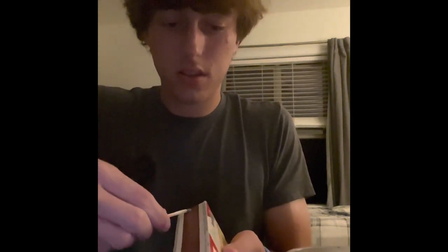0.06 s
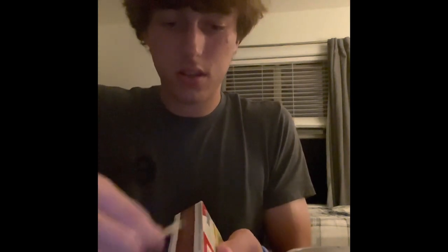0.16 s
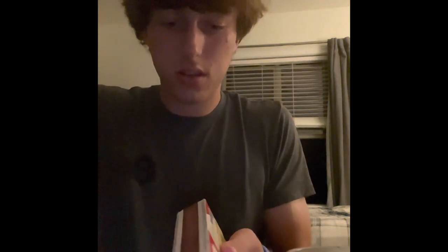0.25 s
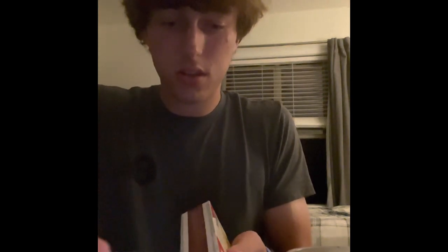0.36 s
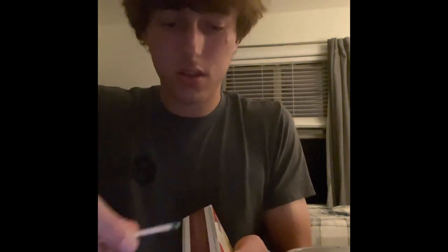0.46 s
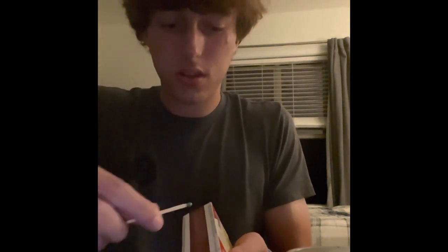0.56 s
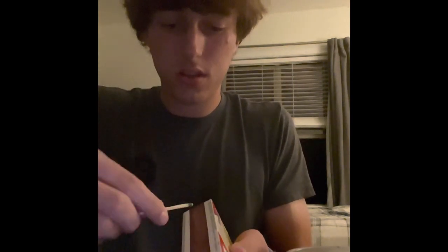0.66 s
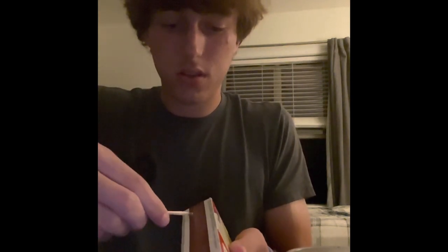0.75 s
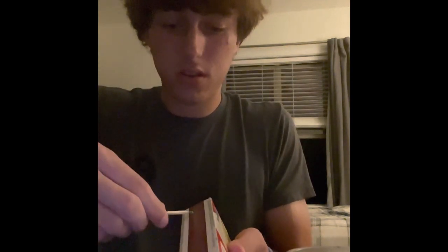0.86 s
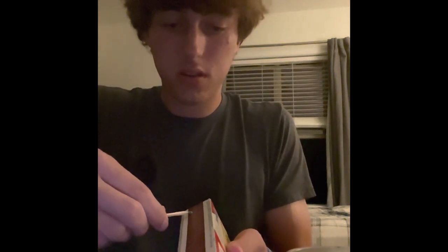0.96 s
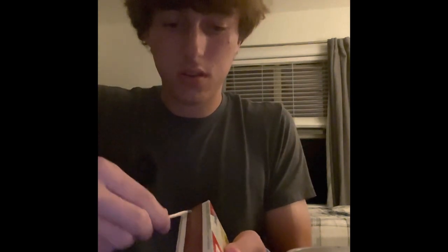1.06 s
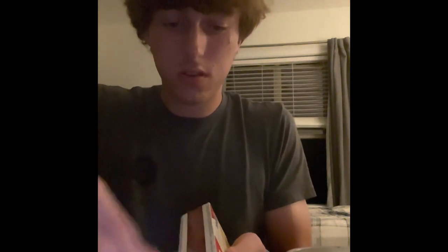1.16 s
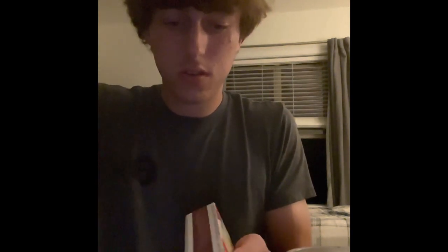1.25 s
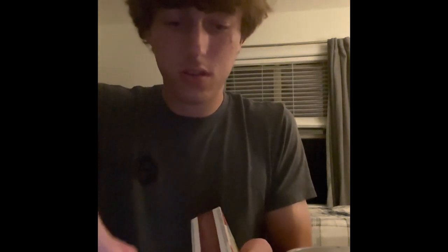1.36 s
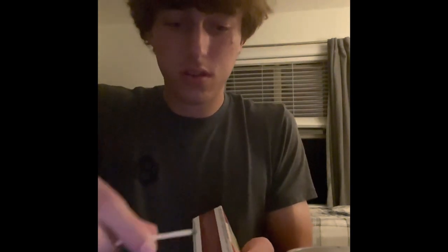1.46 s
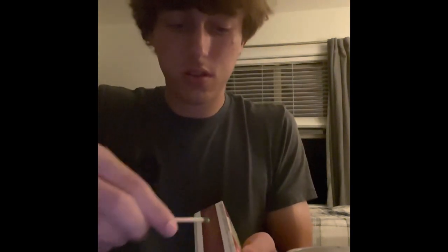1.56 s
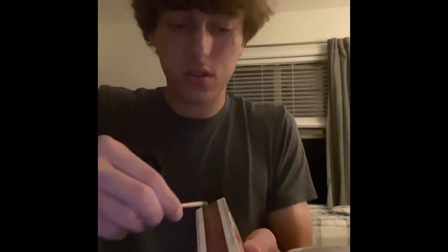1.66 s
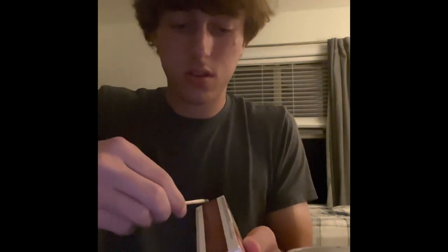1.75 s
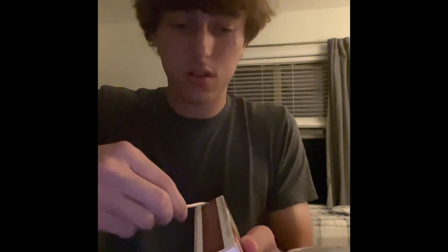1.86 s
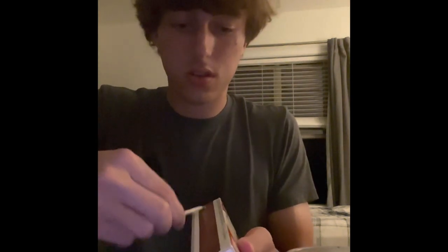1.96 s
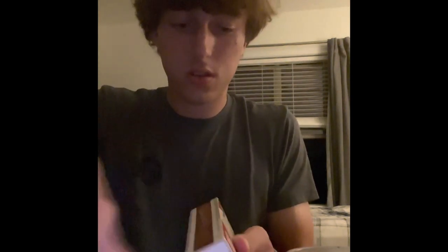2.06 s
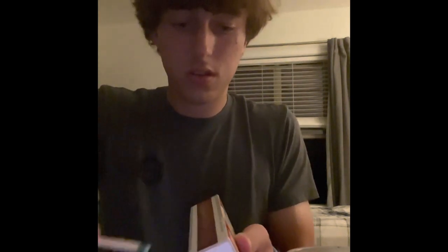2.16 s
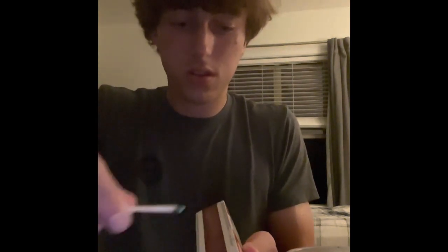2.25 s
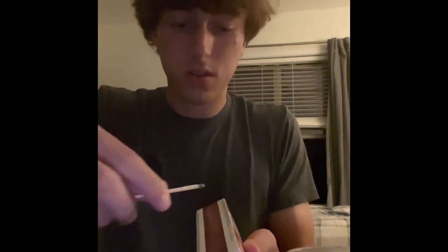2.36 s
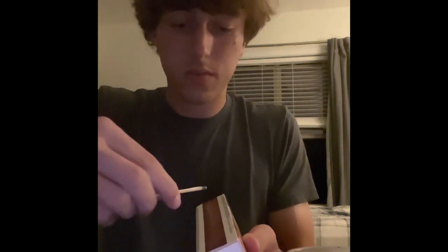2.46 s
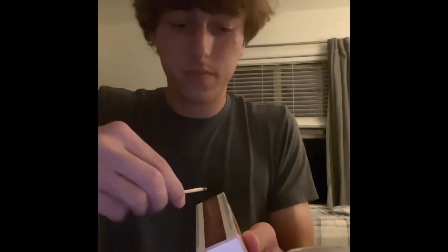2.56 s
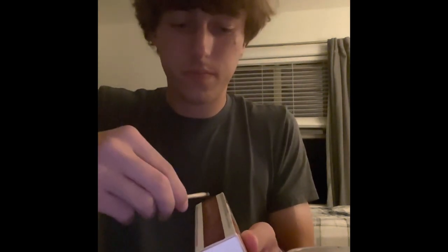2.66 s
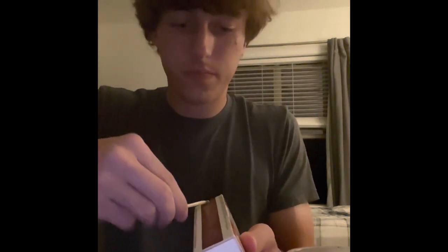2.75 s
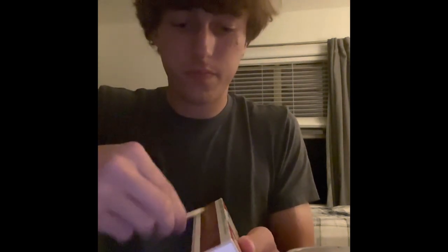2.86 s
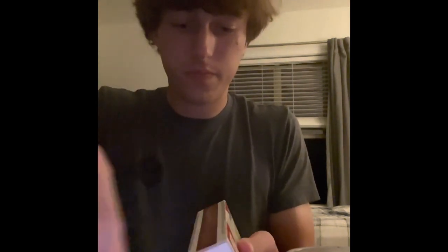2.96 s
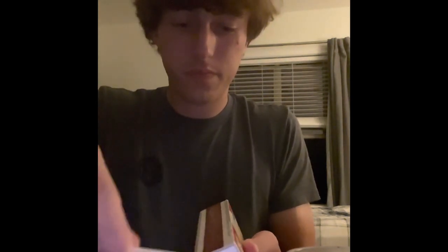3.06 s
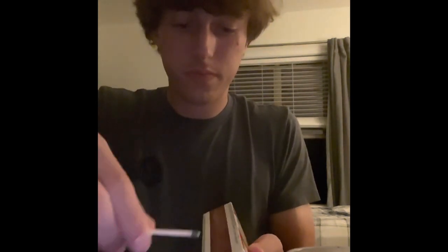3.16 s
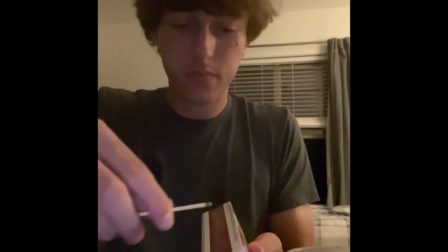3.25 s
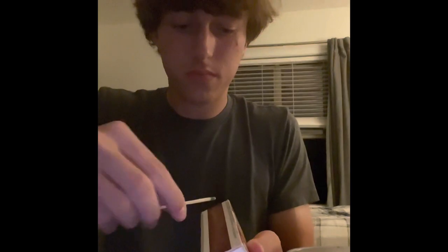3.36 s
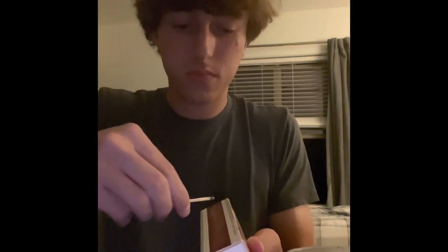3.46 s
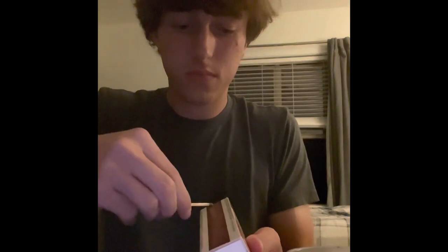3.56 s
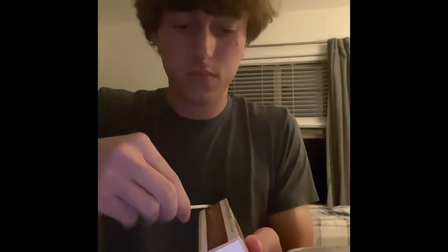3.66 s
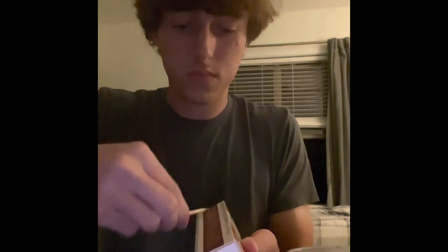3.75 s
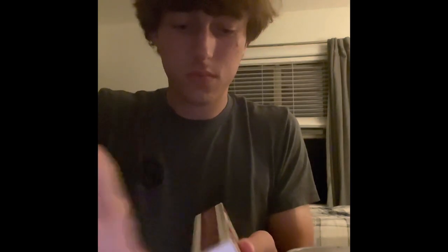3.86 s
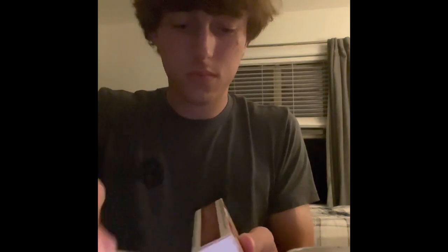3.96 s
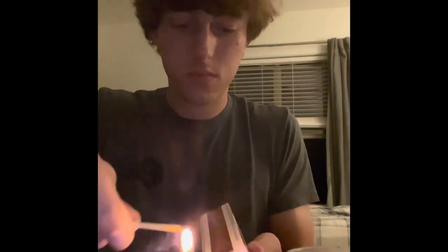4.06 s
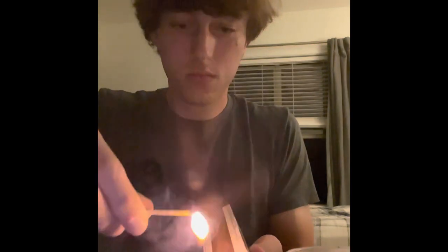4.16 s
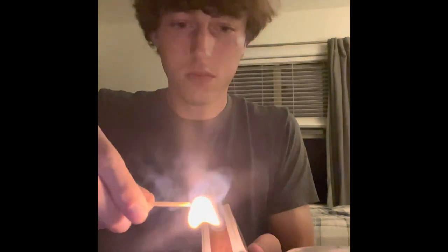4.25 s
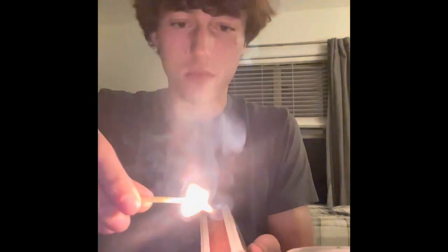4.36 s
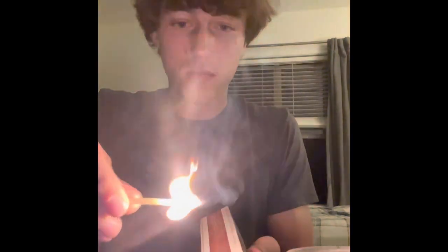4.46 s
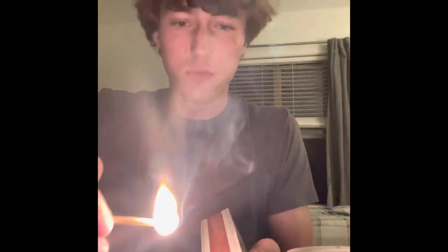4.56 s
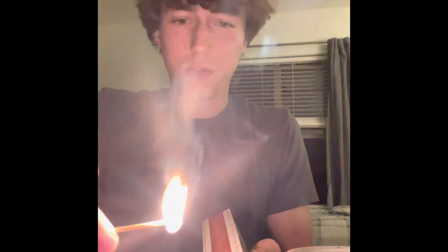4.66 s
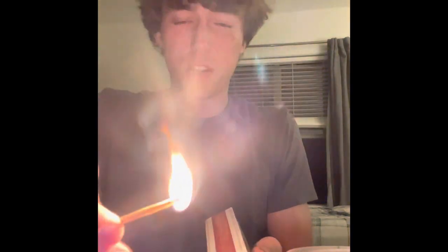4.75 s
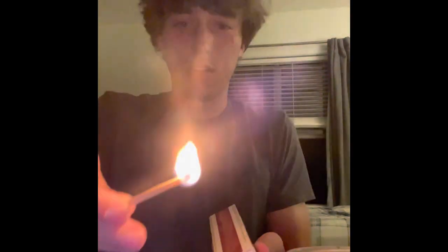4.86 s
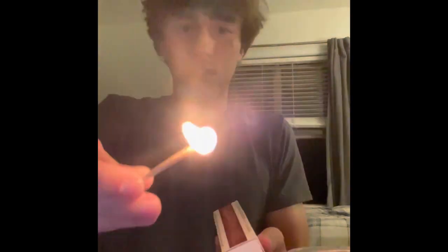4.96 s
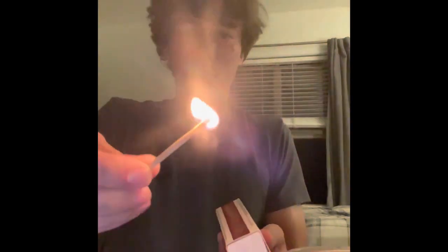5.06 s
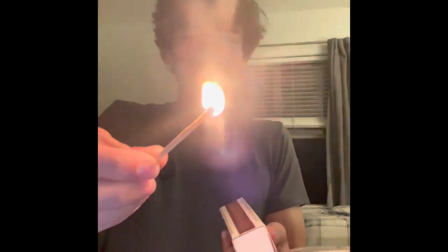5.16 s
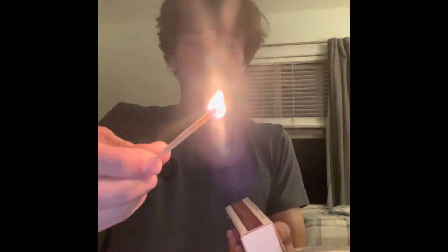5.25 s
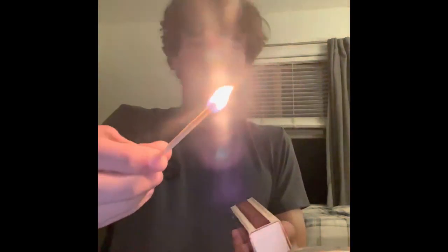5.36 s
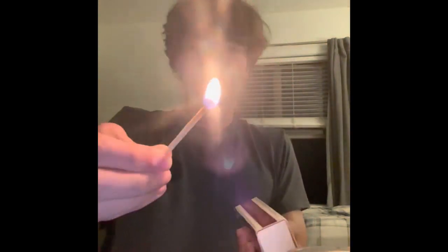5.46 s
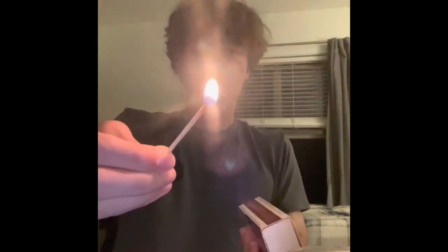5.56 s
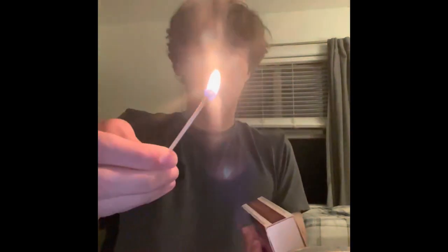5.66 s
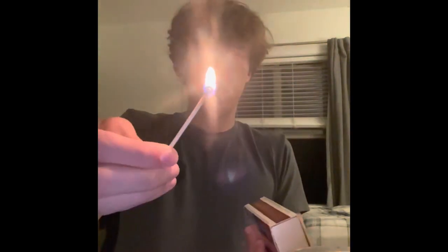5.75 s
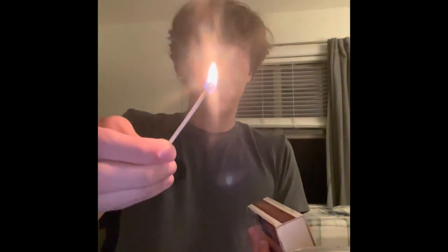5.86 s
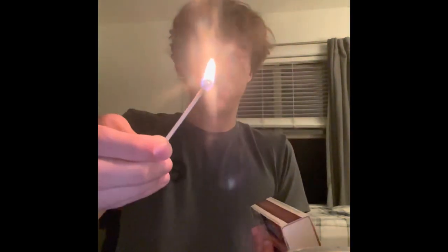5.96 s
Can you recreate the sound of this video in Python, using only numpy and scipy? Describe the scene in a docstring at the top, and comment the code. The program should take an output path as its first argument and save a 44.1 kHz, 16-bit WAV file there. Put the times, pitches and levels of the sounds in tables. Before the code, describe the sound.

A quiet furnished room with low, bassy air noise, a faint steady hum and slight microphone hiss. Close by, at 0.1 s, a match head rasps along a matchbox for a tenth of a second, speeding up and ending with a sharp snap. Light rubs and a tap of the stick at 0.77-0.95 s line it up for a second scrape at 1.08 s. More woody taps precede a third at 1.95 s and a louder, crackling fourth at 2.83 s, its slip kicking the hollow cardboard. Soft finger bumps follow around 3.2 and 3.7 s. The fifth stroke at 3.75 s crackles and catches at about 3.86 s: a dense, bright hiss flares, turning reedier and fizzier, its treble subtly sweeping, over a soft fluttering bass. It drops abruptly near 4.8 s and fades quickly. Small bump and faint ticks at 4.9-5.5 s, then just room hum.

```python
"""Low room noise and hum come first, then a wooden match is scraped five times along a matchbox close by.
Grit plucks the head and rings the cardboard box; specks of the head snap, and the last stroke lights it.
The head flares with a hiss for about a second: noise from many tiny jets, with a sweeping treble echo.
The flame flutters in the bass, and after the flare the match ticks faintly over the hum."""
import sys
import numpy as np
from scipy import signal
from scipy.fft import rfft, irfft
from scipy.io import wavfile
from scipy.ndimage import uniform_filter1d, map_coordinates

SR = 44100
rng = np.random.default_rng(int(sys.argv[2]) if len(sys.argv) > 2 else 0)


def materialize(psi):
    """Save the field psi as 16-bit PCM at rate SR to the path in sys.argv[1].

    A 1-D psi becomes a single channel; in a 2-D psi each row is a channel.
    """
    bounded = np.clip(np.atleast_2d(psi).T, -1, 1)
    quanta = np.round(bounded * 32767).astype(np.int16)
    wavfile.write(sys.argv[1], SR, quanta)


N = 264600
TIME = np.arange(N) / SR
MS = 1e-3  # seconds in a millisecond


def gain_of(db):
    """Decibels to amplitude."""
    return 10 ** (np.asarray(db) / 20)


def evened(x):
    """Scales to an rms of one."""
    return x / np.sqrt(np.mean(x ** 2) + 1e-20)


def read(points, hz):
    """Joins (frequency, value) points on a log-frequency axis."""
    point_hz, value = np.transpose(points)
    return np.interp(np.log(hz + 1), np.log(point_hz + 1), value)


def add(mix, start_s, sound):
    """Mixes a sound in at a time."""
    part = mix[max(round(start_s * SR), 0):][:len(sound)]
    part += sound[:len(part)]


def shaped(x, points):
    """Gives a full-length sound the colour of a (frequency, dB) table."""
    return irfft(rfft(x) * gain_of(read(points, np.fft.rfftfreq(N, 1 / SR))), N)


def smooth_noise(count, size):
    """Slow random movement with an rms of one: white noise averaged over `size` samples."""
    return evened(uniform_filter1d(rng.standard_normal(count), size=size))


def above(hz, corner_hz, order=6):
    """A smooth step from 0 below the corner to 1 above it."""
    return 1 - 1 / (1 + (hz / corner_hz) ** order)


def resonance(hz, centre_hz, width_hz):
    """A single resonant peak of height one."""
    return 1 / (1 + (2 * (hz - centre_hz) / width_hz) ** 2)


def grains(count, per_s, spread_db):
    """A random train of tiny clicks of uneven size and either sign."""
    size = gain_of(spread_db * np.minimum(rng.exponential(1, count), 4))
    sign = rng.choice([-1., 1.], count)
    struck = rng.random(count) < per_s / SR
    return evened(size * sign * struck)


def ringing(colour_db, size=4096):
    """Minimum-phase, unit-energy response to one click of a body with the given colour function."""
    log_gain = np.log(gain_of(colour_db(abs(np.fft.fftfreq(size, 1 / SR)))))
    spectrum = np.exp(np.conj(signal.hilbert(log_gain)))
    ring = np.fft.ifft(spectrum).real[:size // 2]
    return ring / np.linalg.norm(ring)


def burst(ring, level_db, length_ms, chatter, size=800):
    """A click and a quick swell of chatter ring a body; level_db is the rms as if spread over 5 ms."""
    age = np.arange(size) / (SR * MS * max(length_ms, .1))
    push = rng.standard_normal(size) * np.sqrt(age) * np.exp(-1.5 * age)
    push *= chatter * length_ms ** 2 / np.linalg.norm(push)  # long blows are mostly chatter
    push[0] = 1
    sound = signal.fftconvolve(push, ring)
    return gain_of(level_db) * sound / np.linalg.norm(sound) * np.sqrt(5 * MS * SR)


# colour of the low room noise: frequency_hz, relative_gain_db
ROOM_AIR_COLOUR = [(20, -33.5), (32, -24), (42, -5), (52, 2), (64, -7.5), (90, -7.5), (135, -8),
                   (165, -10.5), (200, -5.5), (270, -13.5), (340, -19), (500, -35.5), (800, -50),
                   (1030, -43.5), (1500, -68.5)]
# colour of the microphone hiss: frequency_hz, relative_gain_db
MIC_HISS_COLOUR = [(500, -19), (1000, -8), (1500, -15), (1850, -7.5), (2280, 7.5), (2700, -11), (3300, -18),
                   (6500, -20.5), (10000, -24), (15000, -36)]
# steady room hum: pitch_hz, level_db, waver_hz
HUM_TONES = [(49.9, -61, 0.95), (128.3, -70, 0.5), (241.4, -64.5, 1.2)]


def background(air_db=-58, hiss_db=-75, flicker_db=-0.43):
    """Low room noise, wavering hum tones shared by both channels, and flickering microphone hiss."""
    # long waves reach both ports alike, so the channels part only as pitch rises
    spread = 0.1 * shaped(rng.standard_normal((2, N)), [(40, -23.5), (250, 10), (600, 23.5)])
    air = evened(shaped(rng.standard_normal(N) + spread, ROOM_AIR_COLOUR))
    hiss_noise = rng.standard_normal(N) + .9 * rng.standard_normal((2, N))
    hiss = evened(shaped(hiss_noise, MIC_HISS_COLOUR))
    hiss *= gain_of(flicker_db * smooth_noise(N, 1500))
    hum = 0
    for pitch_hz, level_db, waver_hz in HUM_TONES:
        wavering_hz = pitch_hz + waver_hz * smooth_noise(N, 5000)
        tone = np.sin(2 * np.pi * np.cumsum(wavering_hz) / SR)
        hum = hum + gain_of(level_db) * evened(tone)
    return gain_of(air_db) * air + gain_of(hiss_db) * hiss + hum


# time for the room to fade by 60 dB: frequency_hz, decay_s
ROOM_DECAY = [(200, 0.6), (1000, 0.33), (2800, .31), (7000, 0.26), (14000, 0.15)]


def room(x, early_db=-14, late_db=-13, early_s=0.004):
    """Dense near reflections, then the short tail of a furnished room; channels agree only in the bass."""
    t = np.arange(SR // 2) / SR
    sparse = rng.random((2, len(t))) < 5000 / SR
    common, own = rng.standard_normal((2, len(t))) * sparse
    own = signal.lfilter(*signal.butter(1, 900, "high", fs=SR), own)
    taps = np.array([common + own, common - own])
    early = taps * (t > .001) * np.exp(-t / early_s)
    hz, frame_s, frames = signal.stft(taps * (t > .007), SR, nperseg=256)
    decay = gain_of(-60 * frame_s / read(ROOM_DECAY, hz)[:, None])
    late = signal.istft(frames * decay, SR, nperseg=256)[1][:, :len(t)]
    response = gain_of(early_db) * evened(early) + gain_of(late_db) * evened(late)
    response /= np.sqrt(len(t))
    return signal.fftconvolve(x[None], response, axes=1)[:, :N]


def flame(level_db=-57):
    """The flame swells, flutters softly in the bass and sinks away."""
    colour = [(30, -26.5), (70, -3.0), (130, 1.5), (300, -9.0), (600, -14), (1500, -52.0)]
    rumble = evened(shaped(rng.standard_normal(N), colour))
    swell = np.interp(TIME, [3.85, 4.0, 4.6, 4.8, 5.05], [0.058, 0.67, 1, 0.85, 0.024])
    return gain_of(level_db) * rumble * swell


# resonances of box and stick: pitch_hz, width_hz, lift_db
BOX_RESONANCES = [(688, 180, 9.5), (790, 44, 4), (1047, 130, 9), (1505, 310, 2.5), (2020, 760, 3),
                  (2288, 260, 10), (2600, 86, 3), (3003, 250, 11.5), (3860, 820, 7), (5990, 170, 6),
                  (7230, 250, 4.5), (9500, 1900, 2.5)]
# broad colour of the box under its resonances: frequency_hz, relative_gain_db
BOX_COLOUR = [(60, -32.5), (200, -14.5), (450, -8.5), (640, 1), (1250, -4), (2500, 1.5), (3400, -9.5),
              (5000, -8.5), (8500, -11), (12000, -12), (14000, -19.5), (16000, -24.5)]


def box_db(hz, boom_db, treble_db, panel_hz, panel_db=6, panel_width=0.34):
    """Colour of the box: its modes, and one more ring that depends on where the stick meets it."""
    rings = list(BOX_RESONANCES) + [(panel_hz, panel_width * panel_hz, panel_db)]
    modes = sum(lift_db * resonance(hz, pitch_hz, width_hz) for pitch_hz, width_hz, lift_db in rings)
    boom = boom_db * (1 - above(hz, 2000))
    return read(BOX_COLOUR, hz) + modes + boom + treble_db * above(hz, 3800)


def knock(level_db, boom_db, treble_db, panel_hz, length_ms, panel_db=6, panel_width=.34):
    """One blow rings the box."""
    ring = ringing(lambda hz: box_db(hz, boom_db, treble_db, panel_hz, panel_db, panel_width))
    return burst(ring, level_db, length_ms, chatter=1.0)


# light rubs while the head is lined up: start_s, length_ms, level_db, swell_db
LIGHT_RUBS = [(.768, 16, -45.5, -1.5), (.791, 44.2, -42, -7.5), (.941, 87.7, -42.5, 0)]
RUB_BOOM_DB, RUB_TREBLE_DB, RUB_PANEL_HZ, RUB_PANEL_DB, RUB_BITE_MS = -.5, -15.5, 570, 4.5, 3.3
# the stick knocks on the box: start_s, level_db, boom_db, panel_hz
STICK_TAPS = [(0.7713, -42.5, -0.5, 2350), (.949, -31.5, -12.5, 2250), (1.277, -45, -4, 1730),
              (1.802, -40.5, -5.5, 1000), (1.986, -27, -12, 2450), (2.701, -37, -7.5, 2400),
              (2.871, -29, -14, 2380), (3.555, -37, -15, 2450), (3.907, -37, 3, 1850),
              (3.915, -36, -3, 1880)]
TAP_TREBLE_DB, TAP_MS = -13, 1.1
# soft bumps of the fingers on the hollow box: start_s, level_db, panel_hz, ring_lift_db
FINGER_BUMPS = [(3.177, -57.5, 1050, 6), (3.199, -57, 865, 10), (3.666, -54, 727, 12),
                (3.685, -58.5, 712, 7), (3.937, -43.5, 380, 14), (4.924, -55, 1248, 17)]
BUMP_BOOM_DB, BUMP_TREBLE_DB, BUMP_MS = 12.5, -14, 2


def handling(bump_ring_width=.13):
    """The stick rubs and taps the box and the fingers bump it, each touch ringing the cardboard."""
    out = np.zeros(N)
    for start_s, length_ms, level_db, swell_db in LIGHT_RUBS:
        rub = scrape(length_ms * MS, level_db, swell_db, RUB_BOOM_DB, RUB_TREBLE_DB,
                     RUB_PANEL_HZ, RUB_PANEL_DB, RUB_BITE_MS)
        add(out, start_s, rub)
    for start_s, level_db, boom_db, panel_hz in STICK_TAPS:
        add(out, start_s, knock(level_db, boom_db, TAP_TREBLE_DB, panel_hz, TAP_MS))
    for start_s, level_db, panel_hz, ring_db in FINGER_BUMPS:
        bump = knock(level_db, BUMP_BOOM_DB, BUMP_TREBLE_DB, panel_hz, BUMP_MS, ring_db, bump_ring_width)
        add(out, start_s, bump)
    return out


# broad colour of an exploding speck: frequency_hz, relative_gain_db
SNAP_COLOUR = [(100, -23), (400, -6.5), (800, -6.5), (1600, -9), (2400, 2), (3300, -7), (4200, 1.5),
               (5000, -6.5), (6200, 0), (8000, -8), (11000, -2.5), (13000, -7), (16000, -16)]


def snap(level_db, treble_db, ring_db, length_ms, ring_hz=2320, ring_width_hz=450):
    """A tiny explosion: a sharp, wide-band crack with one brief ring in the upper mids."""
    def colour_db(hz):
        ring = ring_db * resonance(hz, ring_hz, ring_width_hz)
        return read(SNAP_COLOUR, hz) + ring + treble_db * above(hz, 3200)
    return burst(ringing(colour_db), level_db, length_ms, chatter=1.9)


# the loudest specks of the head explode: start_s, level_db, treble_db, sputter_ms
LOUD_SNAPS = [(0.188, -30.5, 1, .8), (1.097, -37, 10, 0.86), (1.154, -30, -4, .5), (2.033, -30, -6, 1.9),
              (2.898, -22.5, -2, 1.1), (2.905, -20, -4, 1.5), (3.802, -27, -6, 1.1),
              (3.8236, -26.5, -5, .9), (3.833, -24.5, 6, 2.2), (3.8374, -20.5, 0, .65),
              (3.952, -41, 6, .54)]
# faint ticks of the match, after a stroke and as it burns: start_s, level_db, treble_db, mid_ring_db
MATCH_TICKS = [(0.426, -69.5, 12, 5), (1.319, -64, 9.5, 2), (4.872, -54, -28, 14.5), (5.109, -55, 7, 18),
               (5.31, -41, -30.5, 11), (5.521, -57.5, -22, 16)]
TICK_MS = 0.414


def crackle():
    """Specks of the head explode under friction; away from the strip the match only ticks."""
    out = np.zeros(N)
    for start_s, level_db, treble_db, sputter_ms in LOUD_SNAPS:
        add(out, start_s, snap(level_db, treble_db, ring_db=1.0, length_ms=sputter_ms))
    for start_s, level_db, treble_db, ring_db in MATCH_TICKS:
        add(out, start_s, snap(level_db, treble_db, ring_db, TICK_MS))
    return out


# colour of the gas jets: frequency_hz, relative_gain_db
JET_COLOUR = [(100, -12.5), (250, 5), (600, 0), (1000, -1), (1500, -5.5), (1950, 0.5), (2350, 4),
              (3000, -10), (4000, -4.5), (5000, -9.5), (7500, -11.5), (10500, -16), (12300, -16),
              (13600, -36)]
# strength of the flare, ahead of its overall trim and flutter: time_s, relative_level_db
BURN_STRENGTH = [(3.97, -47.5), (3.992, -44), (4.174, -50.5), (4.476, -46.5), (4.63, -50.5), (4.638, -48.5),
                 (4.76, -51.5)]
# the head catches and burns out: the hiss drops within OUT_S and its rest fades
CATCH_FIRE_S, BURNT_OUT_S, OUT_S, OUT_DROP_DB, OUT_FADE_DB_PER_S = 3.86, 4.796, 0.0058, 15.5, 60
# the echo off a small near surface lags more and weakens as the match is drawn away
ECHO_MS, ECHO_GROWS_MS, ECHO_CURVE = .411, .09, 2.2
ECHO_STRENGTH, ECHO_FADES = .78, .55


def flare(level_db=-2.5, flutter_db=1.47, fizz_grows=0.49, ridge_grows=1.78, ridge_hz=2400, ridge_width_hz=260):
    """Gas spits from countless pores of the head; as it takes hold, the hiss gains a reedy ridge and fizz."""
    flutter = smooth_noise(N, 500)
    jets = evened(shaped(grains(N, per_s=20000, spread_db=0.5), JET_COLOUR))
    fizz = shaped(jets, [(5500, -36.5), (9500, 5.0)])
    ridge = signal.lfilter(*signal.iirpeak(ridge_hz, ridge_hz / ridge_width_hz, fs=SR), jets)
    fizz_gain = fizz_grows * np.interp(TIME, [4.3, 4.6], [0, 1])
    ridge_gain = ridge_grows * np.interp(TIME, [4.05, 4.3], [0, 1])
    jets = jets + fizz_gain * fizz + ridge_gain * ridge
    spent_s = np.maximum(TIME - BURNT_OUT_S, 0)
    dying_db = OUT_DROP_DB * np.minimum(spent_s / OUT_S, 1) + OUT_FADE_DB_PER_S * spent_s
    burn_db = np.interp(TIME, *np.transpose(BURN_STRENGTH))
    jets *= (TIME > CATCH_FIRE_S) * gain_of(level_db + burn_db - dying_db + flutter_db * flutter)
    # a small surface throws back mostly treble, inverted, so slow notches sweep through the top of the hiss
    thrown = shaped(jets, [(1000, -14), (4000, -7), (6500, 0)])
    burnt = np.clip((TIME - CATCH_FIRE_S) / (BURNT_OUT_S - CATCH_FIRE_S), 0, 1)
    delay_s = (ECHO_MS + ECHO_GROWS_MS * burnt ** ECHO_CURVE) * MS
    echo = map_coordinates(thrown, [(TIME - delay_s) * SR], order=3)
    return jets - ECHO_STRENGTH * (1 - ECHO_FADES * burnt ** 2) * echo


def scattered(per_s, length_s, count=16):
    """Uneven moments within a stroke, as shares of its length."""
    at = (np.arange(count) + rng.random(count)) / max(per_s * length_s, 1e-3)
    return at[at < 1]


# moments when the head catches on the grit; level against the stroke
CATCHES_PER_S, CATCH_DB, CATCH_HZ, CATCH_SPREAD_OCT = 45, -4.5, 1900, .45


def scrape(length_s, level_db, swell_db, boom_db, treble_db, panel_hz, panel_db, bite_ms,
           full_speed_at=.53, boom_lag=0.26, grit_lag=.5, judder_db=1.5):
    """Grit plucks the head thousands of times a second; boom and treble follow its speed, and it catches."""
    size = SR // 4
    out = np.zeros(size)
    teeth = grains(size, per_s=9000, spread_db=2.5)[:round(length_s * SR)]
    judder = smooth_noise(size, 200)[:len(teeth)]  # the head grips and slips
    along = np.linspace(0, 1, len(teeth))
    bite = np.minimum(along * length_s / (max(bite_ms, 1) * MS), 1) ** 2
    slow_db = -swell_db * np.maximum(1 - along / full_speed_at, 0) ** 1.4
    push = evened(teeth * gain_of(judder_db * judder))
    push = push * gain_of(level_db + slow_db) * bite * signal.windows.tukey(len(teeth), .06)
    ring = ringing(lambda hz: box_db(hz, boom_db, treble_db, panel_hz, panel_db))
    boom = signal.lfilter(*signal.butter(1, 1100, fs=SR), ring)
    grit = signal.lfilter(*signal.butter(1, 4000, "high", fs=SR), ring)
    middle = ring - boom - grit
    for part, lag, grip in ((boom, boom_lag, 1), (middle, 0, 1), (grit, grit_lag, bite)):
        add(out, 0, signal.fftconvolve(push * grip * gain_of(lag * slow_db), part))
    catch_hz = CATCH_HZ * 2 ** (CATCH_SPREAD_OCT * rng.standard_normal(16))
    catch_gain = bite * gain_of((0.5 + grit_lag) * slow_db)
    for at, hz in zip(scattered(CATCHES_PER_S, length_s), catch_hz):
        catch = knock(level_db + CATCH_DB, boom_db=-4, treble_db=treble_db - 4, panel_hz=hz, length_ms=1.4)
        add(out, at * length_s, catch * np.interp(at, along, catch_gain))
    return out


# full strokes along the strip, each ending as the head slips off the edge: start_s, slip_s, level_db,
# swell_db (up to full speed), panel_hz, slip_level_db, slip_boom_db, slip_ring_hz
FULL_STROKES = [(0.111, 0.202, -28, 20, 1030, -24.5, -16, 2300),
                (1.076, 1.173, -28, 12.5, 930, -38.5, -10.5, 2294),
                (1.947, 2.036, -28, 16, 900, -26, 12.5, 776),
                (2.825, 2.937, -29.5, 13, 992, -19, 17.5, 415.5),
                (3.751, 3.851, -28, 17, 1100, -20, 23.5, 884)]
STROKE_BOOM_DB, STROKE_TREBLE_DB, STROKE_PANEL_DB, SLIP_MS, SLIP_TREBLE_DB = -3, -1, 8, 3.5, -3
BITE_MS_PER_DB = 0.69  # a stroke that starts slower takes longer to bite
# smaller specks go off at random late in a stroke; level against the stroke
SPECKS_PER_S, SPECK_DB, SPECK_TREBLE_DB = 45, -8, 8


def strokes(hot_from=.5):
    """Each stroke scrapes, sets off specks once the head is hot, and kicks the box as it slips off the edge."""
    out = np.zeros(N)
    for start_s, slip_s, level_db, swell_db, panel_hz, slip_db, slip_boom_db, slip_hz in FULL_STROKES:
        length_s = slip_s - start_s
        stroke = scrape(length_s + SLIP_MS * MS, level_db, swell_db, STROKE_BOOM_DB, STROKE_TREBLE_DB,
                        panel_hz, STROKE_PANEL_DB, BITE_MS_PER_DB * swell_db)
        add(out, start_s, stroke)
        add(out, slip_s, knock(slip_db, slip_boom_db, SLIP_TREBLE_DB, slip_hz, length_ms=.9))
        hot_s = (1 - hot_from) * length_s
        speck = snap(level_db + SPECK_DB, SPECK_TREBLE_DB, ring_db=-2, length_ms=.6)
        for at in scattered(SPECKS_PER_S, hot_s):
            add(out, slip_s - at * hot_s, speck)
    return out


def scene(fire_room_db=-3):
    """Match and box close by, with the room behind them."""
    box = strokes() + handling() + crackle()
    fire = flare() + flame()
    return box + fire + room(box + gain_of(fire_room_db) * fire) + background()


# phase between the two microphone ports: frequency_hz, left_lead_rad
PORT_LEAD = [(300, 0), (700, 0), (1100, -.3), (2200, .45), (3300, -.15), (5200, 1), (7000, .45),
             (9000, 1.1), (11500, 1.9), (13000, 2.6), (16000, 2.7)]
# level between the two ports: frequency_hz, left_minus_right_db
PORT_LEVEL = [(50, 0), (250, 2.8), (650, 4), (1050, 6), (1500, 1.2), (2000, 1), (2600, -.7), (6000, .6),
              (16000, 0)]
EDGE_HZ = 15900  # top of the recorded band


def record(dry):
    """Two microphone ports differ in phase and level; then a low-pass limits the band."""
    hz = np.fft.rfftfreq(N, 1 / SR)
    half = np.array([[.5], [-.5]])  # each port takes half the difference
    ports = gain_of(half * read(PORT_LEVEL, hz)) * np.exp(1j * half * read(PORT_LEAD, hz))
    low_pass = signal.firwin(511, EDGE_HZ, window=("kaiser", 9), fs=SR)
    return signal.oaconvolve(irfft(rfft(dry) * ports, N), low_pass[None], "same")


dry = scene()
out = record(dry)
materialize(out)
```